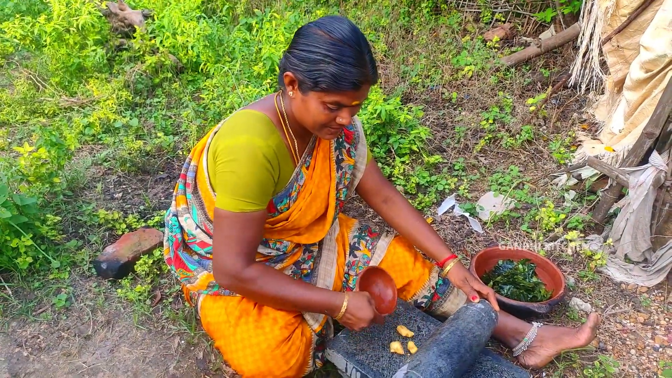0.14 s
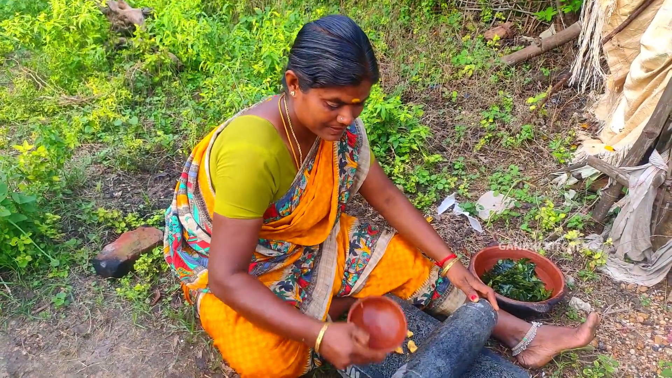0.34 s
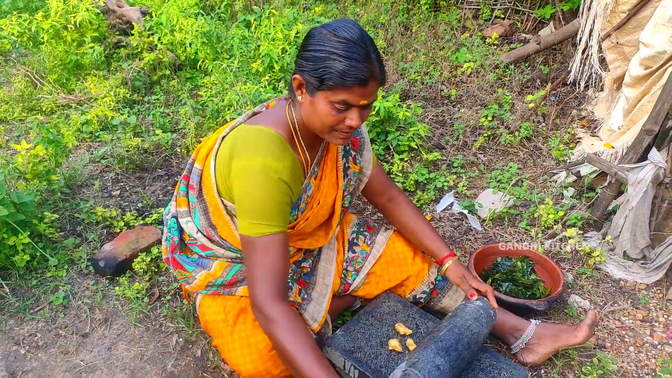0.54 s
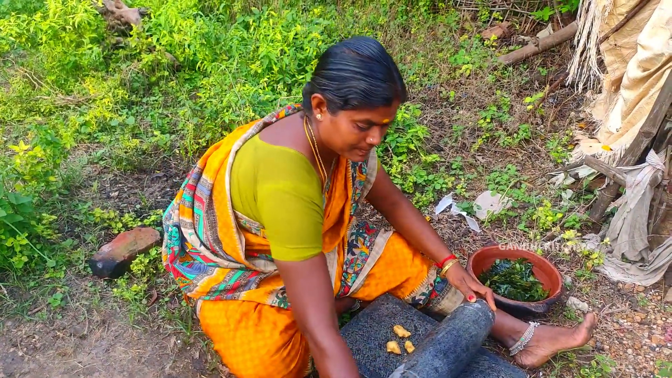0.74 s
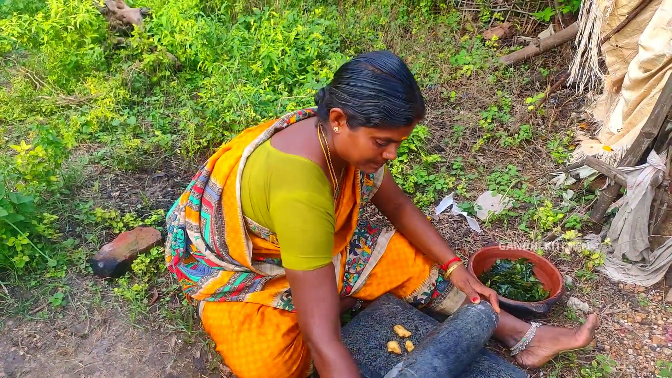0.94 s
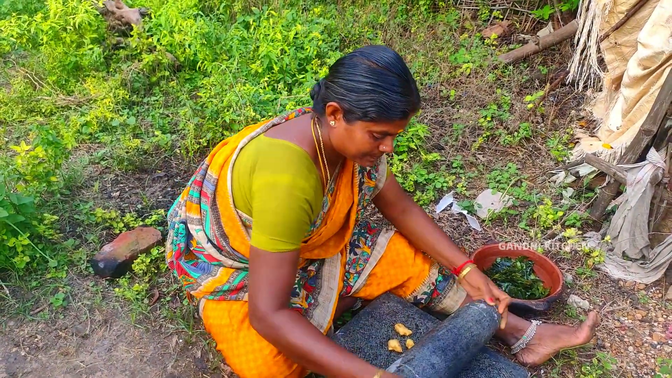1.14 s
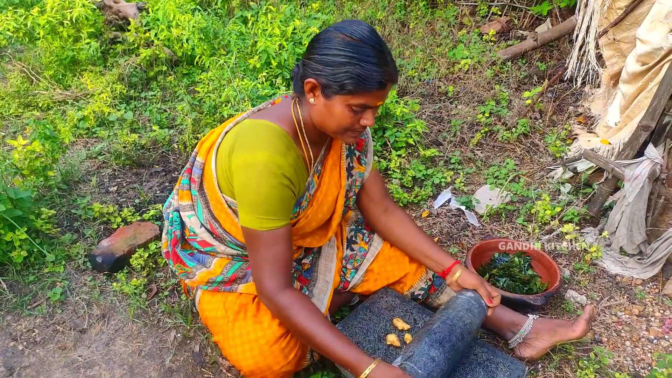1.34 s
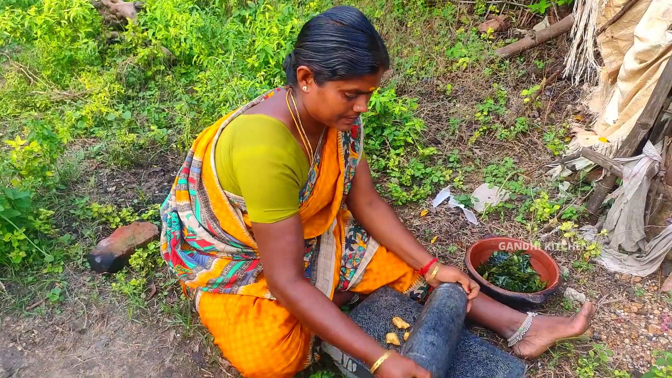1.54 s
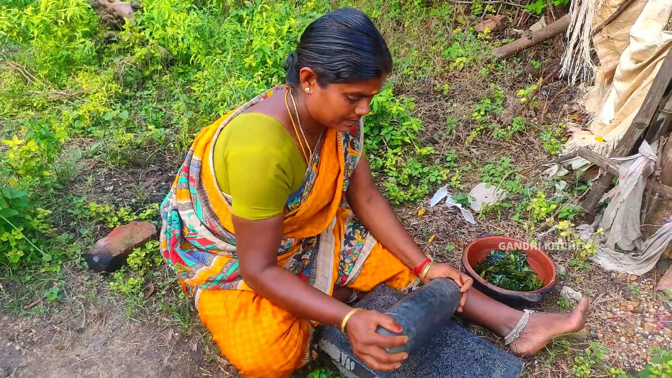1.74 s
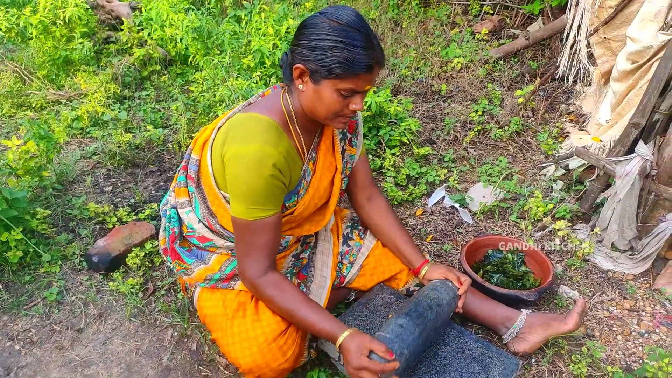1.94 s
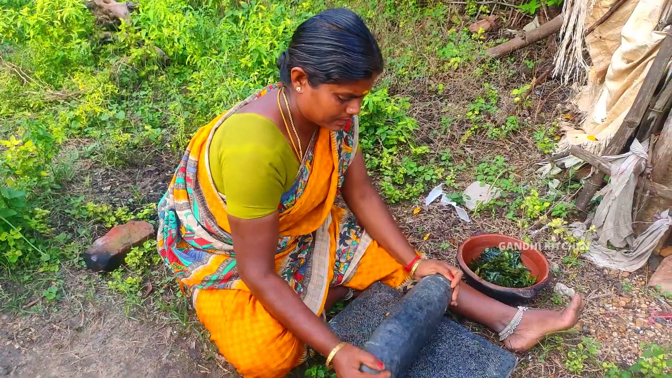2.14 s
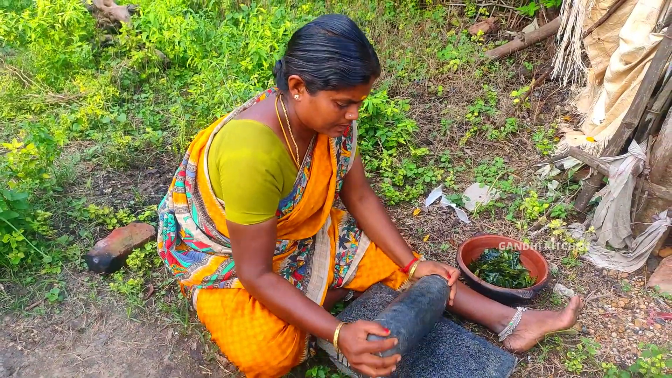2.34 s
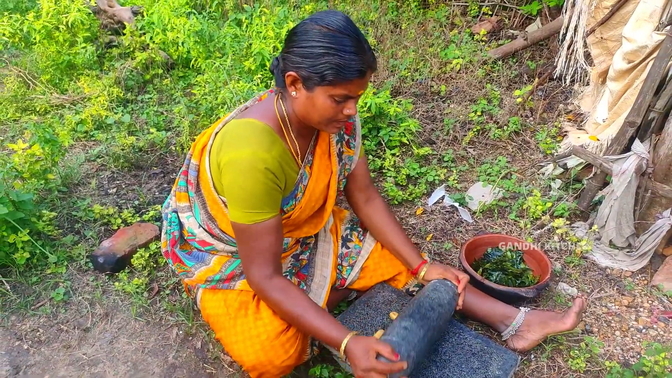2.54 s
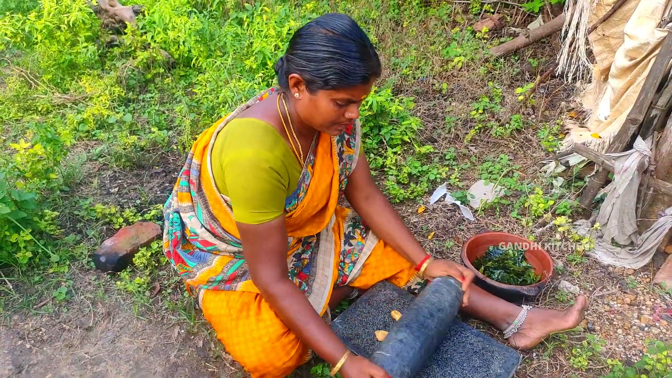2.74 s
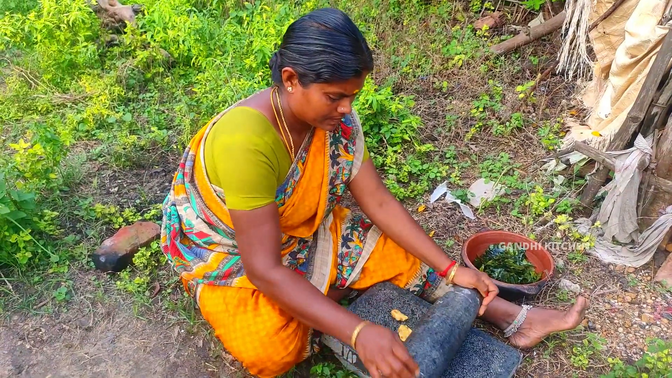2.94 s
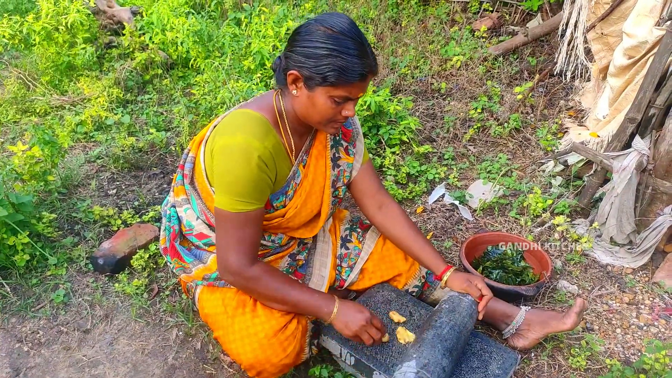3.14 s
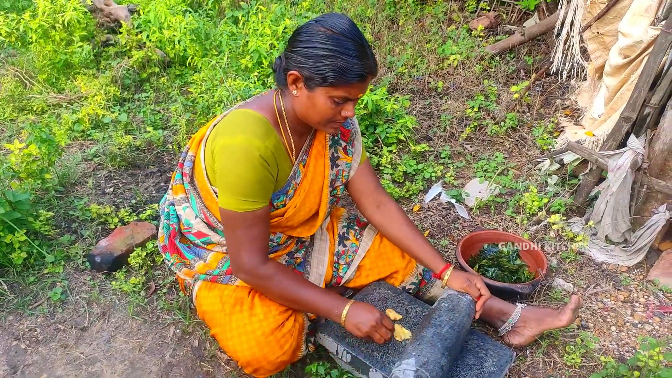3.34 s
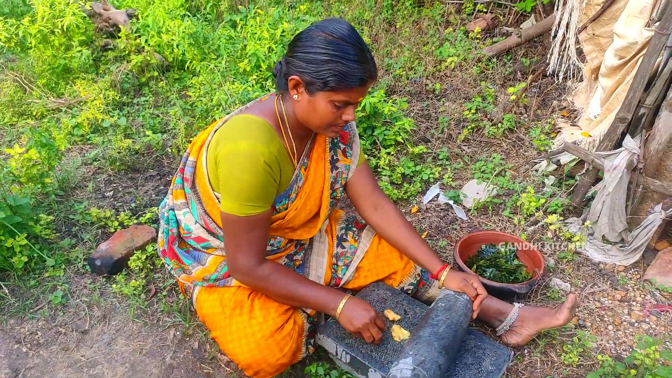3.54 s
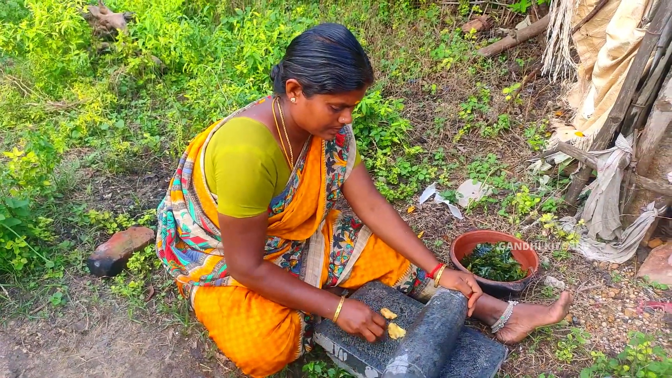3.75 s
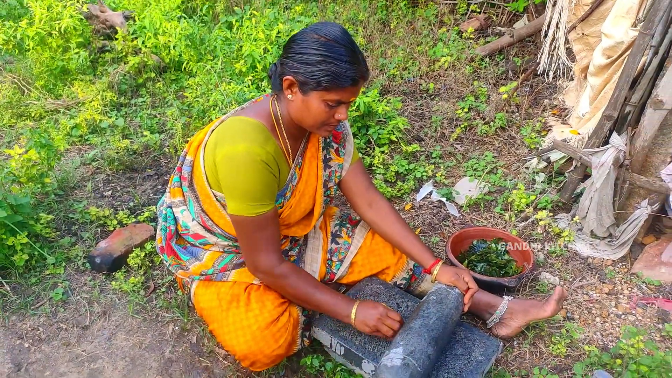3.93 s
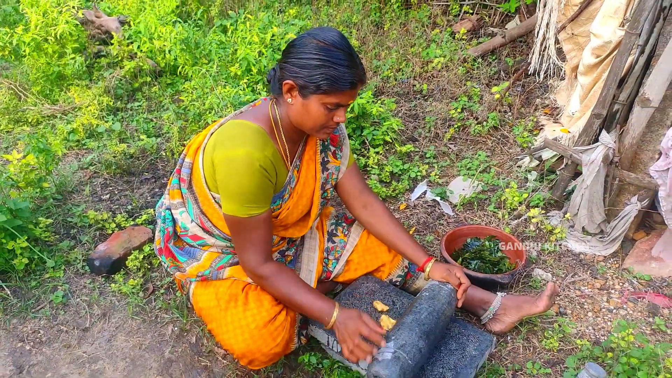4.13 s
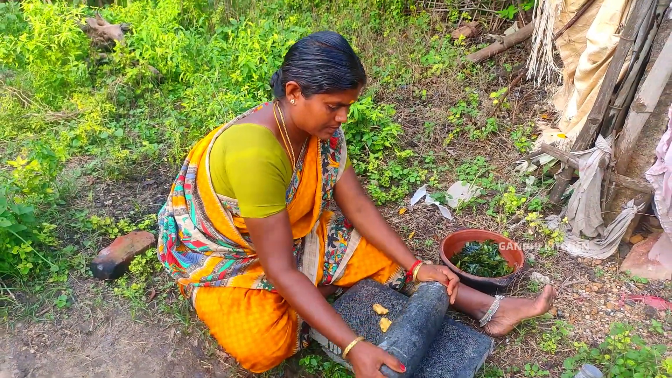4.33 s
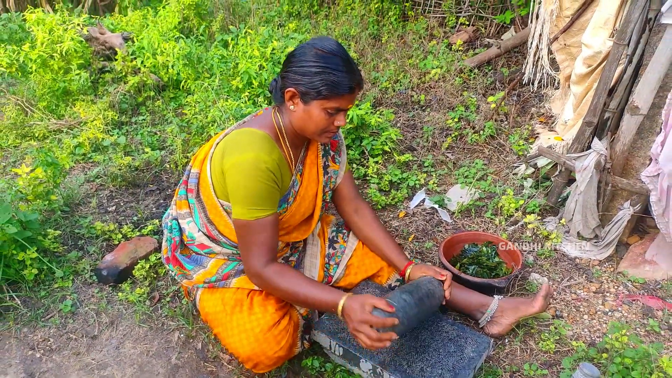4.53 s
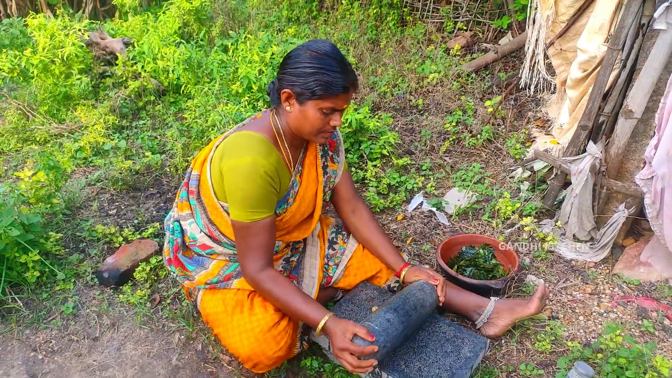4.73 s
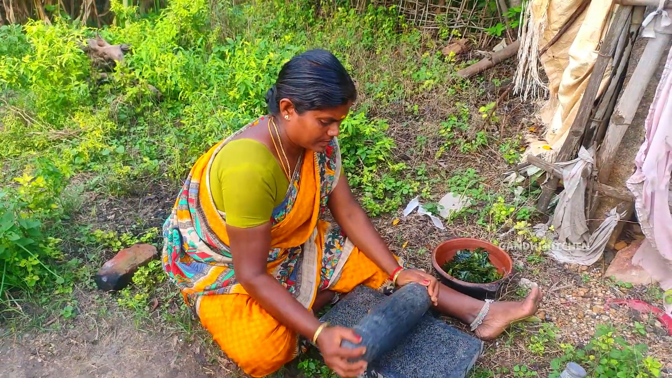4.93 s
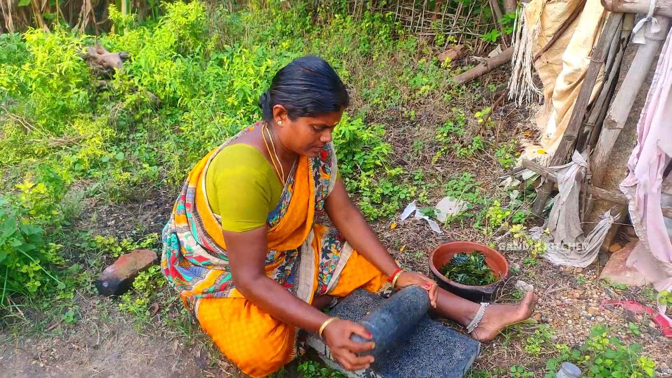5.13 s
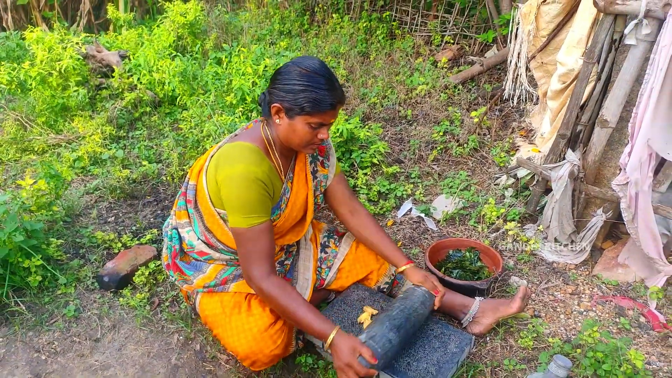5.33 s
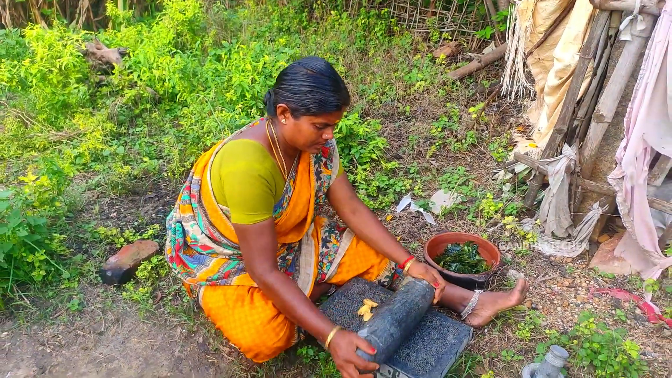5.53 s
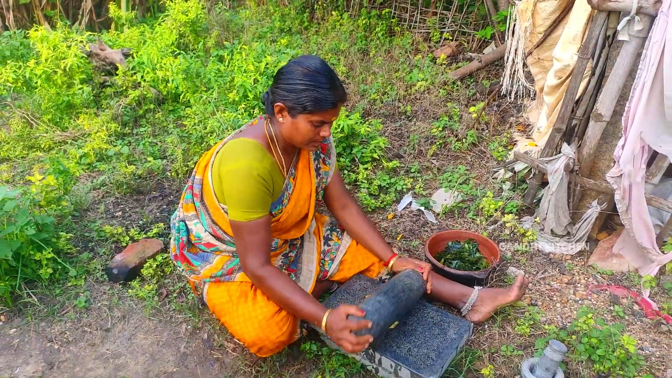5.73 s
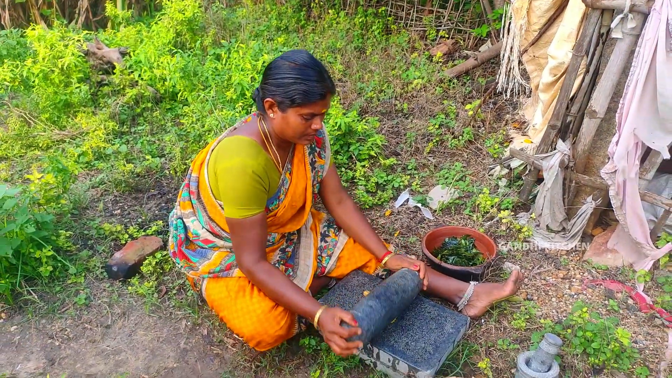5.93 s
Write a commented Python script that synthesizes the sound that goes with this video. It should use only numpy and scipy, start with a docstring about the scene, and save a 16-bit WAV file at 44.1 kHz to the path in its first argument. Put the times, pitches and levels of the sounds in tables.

```python
"""Stone roller crushing ginger and garlic

Outdoors, a heavy stone roller is knocked onto ginger and garlic on a flat grinding stone.
Each blow is a few quick pushes into damped stone tones; crunches are short bursts of uneven noise.
Bangles clink and a bowl taps as sets of fading tones, and bird whistles are gliding tones with scatter.
Behind them an engine throbs on low multiples of its firing rate, a faint whine fades away, and
filtered noise makes the rumble, the hiss and the rustling leaves.
"""
import sys
import numpy as np
from scipy import signal
from scipy.fft import rfft, irfft, next_fast_len
from scipy.io import wavfile
from scipy.ndimage import uniform_filter1d

SR = 44100
rng = np.random.default_rng(int(sys.argv[2]) if len(sys.argv) > 2 else 0)


def master(y):
    """Save y as 16-bit WAV."""
    cut = np.clip(np.atleast_2d(y).T, -1, 1)
    pcm = np.round(cut * 32767)  # scale
    wavfile.write(sys.argv[1], SR, pcm.astype(np.int16))


N = 263718
TIME = np.arange(N) / SR  # seconds

# The far engine's speed. Each row: time in seconds, firing rate in Hz.
ENGINE_SPEED = [(0, 33.5), (1.5, 31.5), (3.0, 34.5), (4.2, 33.5), (5.98, 32.5)]
# The engine's tones. Each row: multiple of the firing rate, level in dB.
ENGINE_ORDERS = [(2, -59.5), (3, -55.5), (4, -49), (5, -60.5), (6, -52), (7, -66), (9, -66.5), (13, -67)]
# A faint far whine. Each row: pitch in Hz, level in dB before the fade settings below.
WHINE_LINES = [(214, -52), (1080, -60.5)]
# The whine holds, then fades to a trace: gain while it holds, gain that is left at the end.
WHINE_DB, WHINE_REST_DB = 3.5, -20
WHINE_HOLD_S, WHINE_FADE_DB_PER_S = 1, 23

# Tone colour of the far rumble. Each row: pitch in Hz, relative level in dB.
RUMBLE_COLOUR = [(25, -20), (52, -18), (75, -5), (115, 3), (210, 2.5), (280, -6), (360, -12.5),
                 (500, -18.5), (720, -25.5), (950, -11.5), (1100, -12), (1400, -28.5), (1750, -31.5),
                 (2300, -63.5)]
# Tone colour of the hiss. Each row: pitch in Hz, relative level in dB.
HISS_COLOUR = [(180, 0.5), (300, 8), (520, -3), (780, 1), (920, -9.5), (1080, -5.5), (1380, -14),
               (1750, -6.5), (2400, -17), (2780, -13.5), (3100, -17.5), (4100, -25), (5250, -18),
               (6000, -23.5), (7500, -26), (9000, -59.5)]
# Tone colour of the leaves. Each row: pitch in Hz, relative level in dB.
LEAVES_COLOUR = [(1500, -19), (2400, -25.5), (3500, 0), (4200, 1), (5500, -1), (6000, 2.5), (7500, -4.5),
                 (9000, -16)]
# Course of the rumble. Each row: time in seconds, level in dB before the layer gain.
RUMBLE_LEVEL = [(0.0, -44.5), (1.91, -43), (5.33, -49), (5.98, -46.5)]
# Course of the hiss. Each row: time in seconds, level in dB before the layer gain.
HISS_LEVEL = [(0.0, -62), (1.4, -59), (2.71, -66), (3.43, -77.5), (3.85, -78.5), (4.3, -87), (4.81, -71),
              (5.01, -69.5), (5.98, -78)]
RUMBLE_GAIN_DB, HISS_GAIN_DB = -0.5, 11  # the layer gains
# The leaves stir. Each row: middle in seconds, reach in time in seconds, rise above their rest in dB.
RUSTLES = [(3.75, .15, 8.5), (4.48, 0.26, 6.5)]
# Left against right in the air noise. Each row: pitch in Hz, left minus right in dB.
AIR_BALANCE = [(100, 0), (500, 2), (1050, 2), (1550, 1), (2100, 10.5), (3500, 11.5), (4700, 12), (5700, 7),
               (6500, 0.5), (7100, -16.5), (7500, -18)]
# How alike left and right are in the air noise. Each row: pitch in Hz, squared likeness (no unit);
# values below zero count as zero.
AIR_LIKENESS = [(60, 0.97), (120, 0.87), (240, 0.81), (470, 0.22), (940, 0.13), (1870, -0.83), (3710, 0.05),
                (7380, -0.49)]

# Distant bird whistles. Each row: start in seconds, length in seconds, first pitch in Hz,
# last pitch in Hz, level in dB.
WHISTLES = [(2.667, 0.021, 7500, 6900, -44), (3.539, 0.13, 3207, 3260, -56.5),
            (3.799, 0.117, 3750, 3370, -68), (3.862, 0.13, 3130, 2800, -56), (4.159, .16, 3320, 3073, -58),
            (4.381, 0.124, 3304, 3170, -58), (4.485, 0.078, 2550, 2383, -62.5),
            (4.975, 0.13, 3204, 3000, -61.5)]

# A small bowl set down on the ground. Each row: start in seconds, level in dB.
BOWL_TAPS = [(1.1105, -28), (1.1185, -32)]
# The bowl's ring. Each row: pitch in Hz, level in dB, time to fade by 60 dB in seconds.
BOWL_MODES = [(790, 1, 0.042), (714, -10, 0.09), (1190, -29, 0.023), (2340, -15, 0.011), (5330, -5, 0.017),
              (5500, -10.5, 0.017), (5970, -14, 0.016)]

# Bangles falling together between blows. Each row: start in seconds, level in dB,
# upper rings against lower ones in dB.
CLINKS = [(3.208, -53.5, -9), (3.283, -56, -17), (4.54, -47, -20), (5.356, -51, 9.5), (5.5, -49, 9),
          (5.835, -55, -17)]
# The bangles' ring. Each row: pitch in Hz, level in dB, time to fade by 60 dB in seconds.
BANGLE_MODES = [(3263, -10.5, 0.1), (3420, 2, 0.053), (3564, -8.5, 0.056), (5250, -25, 0.43),
                (5370, -23.5, 0.2), (7500, -5, 0.07), (7450, -7, 0.064), (11400, 13.5, 0.081)]
# Every blow jolts the bangles: dB for a blow at 0 dB, dB per dB of the blow, upper rings against lower.
JOLT_DB, JOLT_SLOPE, JOLT_UPPER_DB = -38, 0.87, -8.0
# Bangles slide: dB that a blow brings in, dB at rest, reach in time around a blow.
SLIDE_DB, SLIDE_REST_DB, SLIDE_S = -64, -75, 0.12

# Roots and fibres giving way. Each row: start in seconds, level in dB, length in seconds,
# tilt in dB per octave.
CRUNCHES = [(0.993, -36.5, 0.0038, 1.5), (1.964, -35, 0.018, -3.5), (2.2315, -32.5, 0.0099, 0),
            (2.528, -32.5, 0.0066, -3.5), (2.5438, -29.5, 0.0052, -3.5), (2.814, -28, 0.003, -2.5),
            (4.785, -30.5, 0.0084, -3), (5.061, -36.5, 0.024, -3), (5.186, -18, 0.006, -22),
            (5.353, -34, 0.013, -1.5), (5.634, -35, 0.016, 3.5), (5.717, -35, 0.0097, 0.5),
            (5.922, -27.5, 0.012, 1)]
# Tone colour of the crunches. Each row: pitch in Hz, relative level in dB.
CRUNCH_COLOUR = [(60, -51.5), (300, -10), (650, -10.5), (1000, -14), (2200, -13.5), (3000, -6), (3800, -2),
                 (5400, -0.5), (6600, -5), (7600, -7), (11000, 7), (14000, -4)]
# Grit cracks under every blow: dB against the blow, head start, length, tilt in dB per octave.
GRIT_DB, GRIT_LEAD_S, GRIT_S, GRIT_TILT_DB = -40, 0.002, 0.0058, -4.5

# Roller and slab on the soil, heavily damped. Each row: pitch in Hz, width in Hz, level in dB.
STONE_MODES = [(118, 29, -5.5), (243, 600, -11), (385, 58, -5.5), (541, 334, 3), (862, 264, -1.5),
               (1019, 202, 9), (1537, 510, 4), (1690, 250, -5), (1880, 210, -6), (2600, 170, -2.5),
               (3250, 1000, -3)]
# One end of the roller lands, then the other. Each row: start in seconds, level in dB,
# hardness in Hz (the push is weak above this pitch), delay of the other end in seconds,
# level of the other end against the first in dB.
BLOWS = [(1.612, -35.5, 650, 0.0048, -13), (1.65, -19.5, 692, 0.00496, -8.5),
         (2.3411, -5, 1060, .0077, 4.5), (2.5353, -11, 646, .0112, 9.5), (2.6161, -13, 700, 0.00622, -1),
         (2.6348, -8.5, 1020, .0094, -7.5), (2.8094, -1, 818, .009, -5), (2.8806, -24, 660, .008, -19),
         (2.902, -17, 555, .008, -5), (2.918, -10, 700, 0.00743, -10), (3.0271, -20.5, 560, .0108, 0.5),
         (3.088, -30.5, 550, .005, -11), (3.119, -21, 590, 0.00503, -1), (4.514, -17.5, 730, 0.00594, -10),
         (4.789, -34, 753, 0.00484, -6), (4.844, -4.5, 1355, .0075, -1.5), (5.1888, -1.5, 1580, .0115, -4),
         (5.3645, -28, 704, 0.0063, -14), (5.3949, -17, 710, .006, -18.5), (5.4835, -6, 987, .0138, -7.5),
         (5.6181, -28, 613, 0.0045, -6), (5.643, -3.5, 790, 0.00367, -8), (5.72, -11, 730, .0035, 3.5),
         (5.7624, -15, 1030, 0.00537, 1), (5.919, -9, 826, .005, -21), (5.9372, -11, 778, .0076, 3.5)]
# Then it rocks to rest: each gap is this share of the last, and each contact loses this many dB
# (at 1000 Hz hardness; softer pulp takes more).
ROCK_SHRINK, ROCK_LOSS_DB = 0.85, 9.0
HARDNESS_POWER = 0.25  # hardness grows as this power of the force

# What the ground and the body scatter back. Each row: pitch in Hz, relative level in dB.
SCATTER_COLOUR = [(120, -8), (400, 5), (1000, -2), (1800, -5), (3500, -0.5), (7500, 3.5)]
# Width of that scatter. Each row: pitch in Hz, side minus middle in dB.
SCATTER_SIDE = [(150, -29.5), (500, -9.5), (1200, -3), (3000, 1), (7500, -11.5)]
# Left against right at the microphone openings. Each row: pitch in Hz, left minus right in dB.
NEAR_BALANCE = [(100, 1), (500, -0.8), (1100, -3.5), (1800, -1), (2700, 11.5), (3400, 17.5), (5300, 4),
                (6500, 3.5), (7500, -15.5), (9000, -0.5)]
# Timing between the openings. Each row: pitch in Hz, lead of the left side in radians.
NEAR_PHASE = [(500, 0), (1100, 0.39), (1900, 1.58), (3300, -1.06), (5300, -1.64), (7500, -1.83)]
TREBLE_EDGE_HZ, TOP_HZ = 7850, 15700  # the recorder's treble turns weak, then is cut


def undb(db):
    """Turn decibels into a gain."""
    return 10 ** (np.asarray(db) / 20)


def unit(x):
    """Scale to an average (rms) strength of 1."""
    return x / np.sqrt(np.mean(x ** 2))


def bins(size):
    """List the pitches of a spectrum in Hz, none below 1."""
    return np.maximum(np.arange(size // 2 + 1) * SR / size, 1)


def along(points, hz):
    """Read a table of (Hz, value) between its rows, on a log-pitch axis."""
    f, value = np.transpose(points)
    return np.interp(np.log(hz), np.log(f), value)


def colour(x, points, tilt_db=0):
    """Filter by a table of (Hz, dB), with a tilt per octave around 4000 Hz."""
    hz = bins(len(x))
    tilt = tilt_db * np.log2(np.clip(hz, 1500, 8000) / 4000)
    return irfft(rfft(x) * undb(along(points, hz) + tilt), len(x))


def add(track, s, sound):
    """Mix a sound into the track at time s."""
    start = max(int(s * SR), 0)
    track[start:start + len(sound)] += sound[:max(N - start, 0)]


def walk(rate):
    """Make a smooth random wander: about `rate` new values a second, smoothed twice, rms 1."""
    hold = max(int(SR / rate), 1)
    steps = np.repeat(rng.standard_normal(N // hold + 1), hold)
    smooth = uniform_filter1d(uniform_filter1d(steps, hold), hold)
    return unit(smooth[:N])


def fade(t, t60):
    """Die away by 60 dB in t60 seconds."""
    return np.exp(-np.log(1000) * t / t60)


def swell(s, reach_s):
    """Rise and fall smoothly around time s, with a top of 1."""
    return np.exp(-((TIME - s) / reach_s) ** 2)


def ring(modes, upper_db=0, detune=0.0019):
    """Strike an object once: its tones fade separately, each slightly mistuned at random."""
    t = TIME[:SR // 3]
    lowest = modes[0][0]
    out = np.zeros(len(t))
    for hz, db, t60 in modes:
        level = undb(db + upper_db * (hz > 2 * lowest))
        tuned_hz = hz * (1 + detune * rng.standard_normal())
        out += level * fade(t, t60) * np.sin(2 * np.pi * tuned_hz * t)
    return out


def engine(waver_db=0.5, smear=0.45):
    """Low multiples of the firing rate; the moving air shifts each in level and phase."""
    phase = 2 * np.pi * np.cumsum(np.interp(TIME, *np.transpose(ENGINE_SPEED))) / SR
    out = np.zeros(N)
    for k, db in ENGINE_ORDERS:
        level = undb(db + waver_db * walk(11))
        drift = smear * walk(9) + 2 * np.pi * rng.random()
        out += level * np.sin(round(k) * phase + drift)
    return out


def whine(waver=0.0012, waver_db=2.5):
    """Thin far tones that waver in pitch and level, then fade to a trace."""
    lines = np.zeros(N)
    for hz, db in WHINE_LINES:
        level = undb(db + waver_db * walk(11))
        wavering_hz = hz * (1 + waver * walk(33))
        lines += level * np.sin(2 * np.pi * np.cumsum(wavering_hz) / SR)
    drop_db = WHINE_FADE_DB_PER_S * np.maximum(TIME - WHINE_HOLD_S, 0)
    return lines * undb(np.maximum(WHINE_DB - drop_db, WHINE_REST_DB))


def air_noise(points):
    """Coloured stereo noise: a shared part makes the sides alike, mostly in the bass."""
    hz = bins(N)
    like = np.sqrt(np.clip(along(AIR_LIKENESS, hz), 0, 1))
    mid, side = (rfft(colour(rng.standard_normal(N), points)) for _ in range(2))
    channels = []
    for sign in (1, -1):  # left, right
        blend = mid * np.sqrt(1 + like) + sign * side * np.sqrt(1 - like)
        channels.append(irfft(blend * undb(sign * along(AIR_BALANCE, hz) / 2), N))
    pair = np.array(channels)
    return pair / np.std(pair.mean(axis=0))


def shimmer(pair, depth_db, rate, count=20):
    """Let neighbouring bands of pitch swell and sink, each on its own."""
    size = next_fast_len(N)
    place = np.clip(bins(size) / TREBLE_EDGE_HZ, 0, 1) * (count - 1)
    spectrum = rfft(pair, size)
    out = np.zeros((2, N))
    for k in range(count):
        share = np.maximum(1 - np.abs(place - k), 0)  # overlapping triangles that add up to 1
        band = irfft(spectrum * share, size)[:, :N]
        out += band * undb(depth_db * walk(rate))
    return out


def air(leaves_db=-76.5, shimmer_db=2.0, shimmer_rate=11.0):
    """Noise in three layers: a far rumble, a wide hiss of changing level, a faint rustle of leaves."""
    rumble_db = np.interp(TIME, *np.transpose(RUMBLE_LEVEL)) + RUMBLE_GAIN_DB
    hiss_db = np.interp(TIME, *np.transpose(HISS_LEVEL)) + HISS_GAIN_DB
    stir_db = sum(db * swell(s, reach_s) for s, reach_s, db in RUSTLES)
    hiss = air_noise(HISS_COLOUR) * undb(hiss_db)
    leaves = air_noise(LEAVES_COLOUR) * undb(leaves_db + stir_db + 0.98 * walk(15.0))
    rumble = air_noise(RUMBLE_COLOUR) * undb(rumble_db + 0.88 * walk(11))
    return rumble + shimmer(hiss + leaves, shimmer_db, shimmer_rate)


def bird(waver=0.014, flutter_db=1.0, scatter_t60=0.24):
    """Gliding whistles, blurred by scatter on their way through the leaves."""
    out, t = np.zeros(N), TIME[:SR // 3]
    wobble, flutter = 1 + waver * walk(500), undb(flutter_db * walk(90))
    for s, length, start_hz, end_hz, db in WHISTLES:
        progress = np.clip((TIME - s) / length, 0, 1)
        hz = (start_hz + (end_hz - start_hz) * progress) * wobble
        tone = np.sin(2 * np.pi * np.cumsum(hz) / SR)
        out += undb(db) * np.sin(np.pi * progress) * flutter * tone
    scatter = unit(rng.standard_normal(len(t)) * fade(t, scatter_t60)) / np.sqrt(len(t))
    return signal.fftconvolve(out, scatter)[:N]


def bowl(scuff_db=-13.5, scuff_t60=0.045, scuff_tilt_db=-17.5, size=4096):
    """The bowl lands on one edge, then settles, ringing and scuffing the grit each time."""
    out = np.zeros(N)
    for s, db in BOWL_TAPS:
        noise = unit(colour(rng.standard_normal(size), CRUNCH_COLOUR, scuff_tilt_db))
        scuff = noise * fade(TIME[:size], scuff_t60)
        add(out, s, undb(db) * ring(BOWL_MODES))
        add(out, s, undb(db + scuff_db) * scuff)
    return out


def bangles(rebound_db=-19.5, rebound_s=0.0064, rise_s=0.0014, uneven_db=2.5):
    """Jolted by the heavier contact of each blow, bangles touch, touch again, and whisper as they slide."""
    out, onset = np.zeros(N), 1 - np.exp(-TIME[:SR // 3] / rise_s)
    jolts = []
    for s, db, _, gap_s, second_db in BLOWS:
        heavier_s = s + gap_s * (second_db > 0)
        heavier_db = db + max(second_db, 0)
        jolts.append((heavier_s, JOLT_DB + JOLT_SLOPE * heavier_db, JOLT_UPPER_DB))
    for s, db, upper_db in jolts + CLINKS:
        add(out, s, undb(db) * onset * ring(BANGLE_MODES, upper_db))
        again_s = s + rebound_s * (0.5 + rng.random())
        add(out, again_s, undb(db + rebound_db) * onset * ring(BANGLE_MODES, upper_db))
    # noise rubbed through the bangles' own ring, stronger around the blows
    moving = np.max([swell(s, SLIDE_S) for s, *_ in BLOWS], axis=0)
    sliding = unit(signal.fftconvolve(rng.standard_normal(N), ring(BANGLE_MODES))[:N])
    slide_level = undb(SLIDE_REST_DB) + undb(SLIDE_DB) * moving
    return out + sliding * undb(uneven_db * walk(25)) * slide_level


def crunches(release_s=0.0021, rise_s=0.00088, size=4096):
    """Bursts of tiny fractures of uneven size that last while the roller presses."""
    out, t = np.zeros(N), TIME[:size] - size / 8 / SR
    grit = [(s - GRIT_LEAD_S, db + GRIT_DB, GRIT_S, GRIT_TILT_DB) for s, db, *_ in BLOWS]
    for s, db, length, tilt_db in CRUNCHES + grit:
        uneven = undb(3 * np.repeat(rng.standard_normal(size // 32), 32))  # a new size every 32 samples
        grains = rng.standard_normal(size) * uneven
        press = np.clip(t / rise_s, 0, 1) * np.exp(-np.maximum(t - length, 0) / release_s)
        add(out, s + t[0], undb(db) * press * unit(colour(grains, CRUNCH_COLOUR, tilt_db)))
    return out


def rocking(s, db, hard_hz, gap_s, second_db, count=3):
    """List one blow's contacts: one end, the other end, then ever quicker, weaker, softer rebounds."""
    contacts, rel_db = [(s, db, hard_hz)], second_db
    for _ in range(count):
        s = s + gap_s
        contacts.append((s, db + rel_db, hard_hz * undb(rel_db) ** HARDNESS_POWER))
        gap_s = gap_s * ROCK_SHRINK
        rel_db = rel_db - ROCK_LOSS_DB * 1000 / hard_hz
    return contacts


def stone_body(hz, low_hz=68.4, ground_s=0.00196, ground_db=-14.5):
    """How the damped stones answer a push at each pitch, with one close reflection."""
    body = np.zeros(len(hz), complex)
    for f, width, db in STONE_MODES:
        body += undb(db) * 1j * hz * width / (f ** 2 - hz ** 2 + 1j * hz * width)
    body = body / (1 + (low_hz / hz) ** 4)  # the stones are too small to radiate deep bass
    return body * (1 + undb(ground_db) * np.exp(-2j * np.pi * hz * ground_s))


def knocks(steepness=5.4, rough_db=-11.0, rough_s=0.0043, rough_reach=1.256, rough_power=1.2, size=8192):
    """Short pushes into the stones; pulp makes them longer and duller, bare stone makes them grate."""
    out, hz = np.zeros(N), bins(size)
    body = stone_body(hz)
    for blow in BLOWS:
        for s, db, hard_hz in rocking(*blow):
            push = irfft(-body / (1 + (hz / hard_hz) ** steepness))
            noise = rng.standard_normal(size) * np.exp(-TIME[:size] / rough_s)
            grains = rfft(unit(noise)) / np.sqrt(size)
            grate = irfft(body * grains / (1 + (hz / (rough_reach * hard_hz)) ** steepness))
            bare = (hard_hz / 1000) ** rough_power  # harder contacts grate more
            knock = (push + undb(rough_db) * bare * grate) / np.abs(push).max()
            # the contact sits mid-buffer, so the push can begin just before it
            add(out, s - size / 2 / SR, undb(db) * np.roll(knock, size // 2))
    return out


def yard(x, near_db=-11.0, near_t60=0.099, far_db=-29.5, far_t60=0.83, gap_s=0.0028):
    """Dense early scatter from ground and body, then a faint tail from the surroundings."""
    t = TIME[:SR // 2]
    onset = np.clip(t / gap_s - 1, 0, 1)
    early, late = (unit(onset * fade(t, t60)) / np.sqrt(len(t)) for t60 in (near_t60, far_t60))
    spread = undb(near_db) * early + undb(far_db) * late
    mid, side = (colour(rng.standard_normal(len(t)), SCATTER_COLOUR) for _ in range(2))
    side = colour(side, SCATTER_SIDE)
    return np.array([x + signal.fftconvolve(x, spread * (mid + sign * side))[:N] for sign in (1, -1)])


def ports(pair):
    """The two microphone openings differ in level and phase at each pitch."""
    hz = bins(N)
    half = undb(along(NEAR_BALANCE, hz) / 2) * np.exp(0.5j * along(NEAR_PHASE, hz))
    return irfft(rfft(pair) * np.array([half, 1 / half]), N)


def scene():
    """The work at the stone and the bird, in front of the open-air background."""
    background = engine() + whine() + air()
    work = yard(bowl() + bangles() + crunches() + knocks())
    ending = np.clip((TIME[-1] - TIME) * SR / 64, 0, 1)  # fade out over the last 64 samples
    return background + ports(work * ending + bird())


def record(dry, shelf_db=-38.0, self_noise_db=-84.5):
    """The recorder weakens the treble, hisses faintly, clips at full scale and cuts the top."""
    treble_cut = signal.ellip(8, 0.1, 50, TREBLE_EDGE_HZ, fs=SR, output="sos")
    narrow = signal.sosfiltfilt(treble_cut, dry)
    self_noise = undb(self_noise_db) * rng.standard_normal(dry.shape)
    clipped = np.clip(narrow + undb(shelf_db) * (dry - narrow) + self_noise, -1, 1)
    top_cut = signal.ellip(8, 0.1, 70, TOP_HZ, fs=SR, output="sos")
    return signal.sosfilt(top_cut, clipped)


dry = scene()
out = record(dry)
master(out)
```